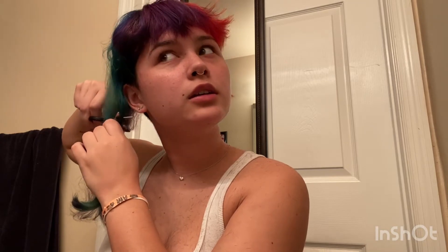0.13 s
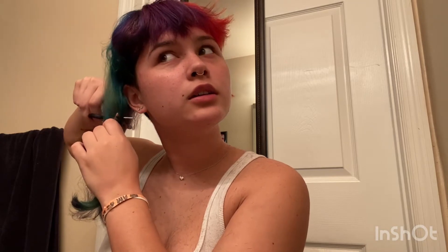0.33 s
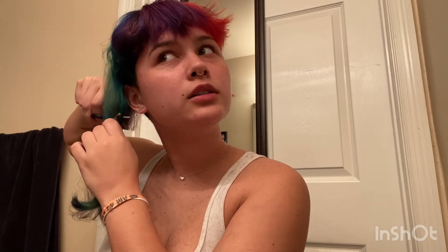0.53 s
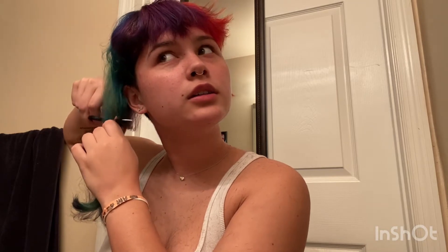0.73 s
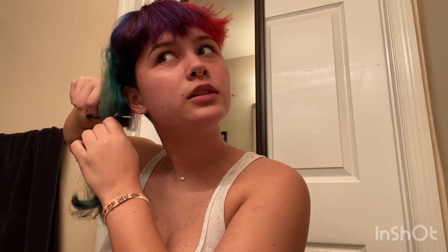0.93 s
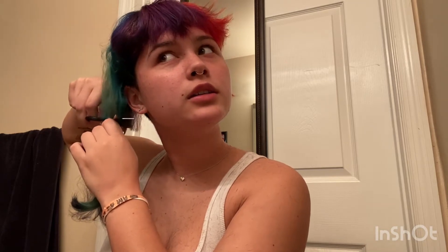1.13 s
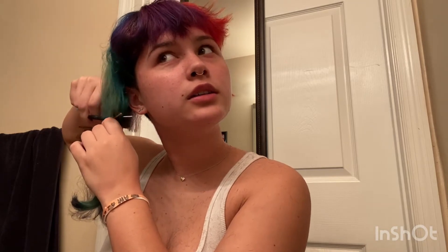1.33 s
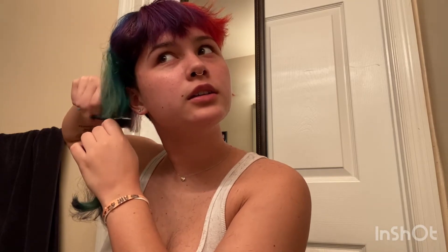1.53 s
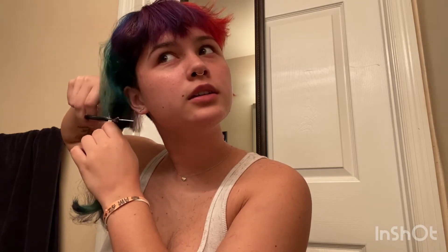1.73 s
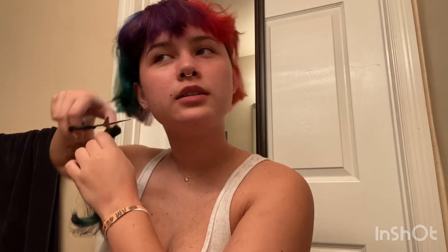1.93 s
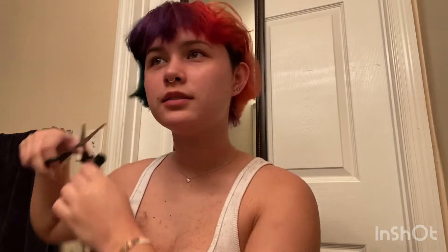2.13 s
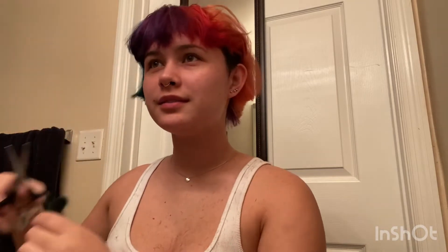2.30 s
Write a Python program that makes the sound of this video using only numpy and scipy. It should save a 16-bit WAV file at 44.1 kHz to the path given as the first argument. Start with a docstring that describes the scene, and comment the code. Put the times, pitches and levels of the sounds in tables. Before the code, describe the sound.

Close crisp snipping of hair, about three strokes a second, with faint blade slides between; then a pause with a faint swish and a bright metal snap, while a fan hums low in a small reverberant bathroom.

```python
"""Scissors chew through a thick lock of hair in a small hard bathroom, close to a two-port microphone.
From the start each stroke severs thousands of fibres, whose snaps set the steel blades ringing, and the
room answers; a fan motor hums in air noise while a low tone of the room swells and sinks. Between strokes
the blades slide open, a fainter burst of the same ringing, and now and then a touch and rattle clicks.
Late on the lock is drawn away with a swish of smooth noise, then come the last slides and clicks."""
import sys
import numpy as np
from scipy import signal
from scipy.fft import rfft, irfft, next_fast_len
from scipy.io import wavfile

SR = 44100
rng = np.random.default_rng(int(sys.argv[2]) if len(sys.argv) > 2 else 0)


def log_audio(samples):
    """Write samples as a 16-bit WAV file to the path given in sys.argv[1]."""
    # one column per channel
    frames = np.atleast_2d(samples).T
    # limit to full scale, then quantise
    limited = np.clip(frames, -1, 1)
    pcm = np.round(limited * 32767).astype(np.int16)
    wavfile.write(sys.argv[1], SR, pcm)


def voltage_ratio(decibels):
    """Convert decibels (scalar or array-like) to amplitude ratios, 20 dB per decade."""
    exponent = np.asarray(decibels, float) / 20
    return 10 ** exponent


N = 108574
T = np.arange(N) / SR
DEEP_TOP_HZ, LOW_TOP_HZ = 1460, 2850


def rms_one(x):
    """Normalisation: scales a signal to unit root-mean-square level."""
    return x / np.sqrt(np.mean(x ** 2) + 1e-20)


def log_interp(hz, points):
    """Logarithmic frequency scale: reads a table of (hz, value) between its points."""
    point_hz, value = np.transpose(points)
    return np.interp(np.log(hz), np.log(point_hz), value)


def colour(x, points):
    """Minimum-phase filtering: a folded cepstrum shapes the spectrum so that nothing sounds early."""
    size = 2 ** 13
    hz = np.maximum(np.arange(size // 2 + 1) * SR / size, 1)
    gain = voltage_ratio(np.maximum(log_interp(hz, points), -90))
    cepstrum = irfft(np.log(gain))
    # fold the backward half onto the forward half
    cepstrum[1:size // 2] *= 2
    cepstrum[size // 2 + 1:] = 0
    impulse = irfft(np.exp(rfft(cepstrum)))
    return signal.fftconvolve(x, impulse)[:len(x)]


def drift(corner_hz):
    """Low-passed random walk of chance: two equal poles smooth noise to a slow signal of spread 1."""
    step = 40  # samples between slow values
    r = np.exp(-2 * np.pi * corner_hz * step / SR)
    noise = rng.standard_normal(N // step + 2002)
    slow = signal.lfilter([1], [1, -2 * r, r * r], noise)[2000:]  # settled part
    return np.interp(np.arange(N) / step, np.arange(len(slow)), rms_one(slow))


def resonance(x, hz, width_hz):
    """Damped oscillator: a pole pair rings at hz and decays faster the wider its peak."""
    r = np.exp(-np.pi * width_hz / SR)
    zeros = [(1 - r * r) / 2, 0, (r * r - 1) / 2]
    poles = [1, -2 * r * np.cos(2 * np.pi * hz / SR), r * r]
    return signal.lfilter(zeros, poles, x)


def split(x, *edges_hz):
    """Complementary filtering: parts below, between and above the edges add up to the whole."""
    below = [signal.sosfiltfilt(signal.butter(5, hz, fs=SR, output="sos"), x) for hz in edges_hz]
    return np.diff([0 * x, *below, x], axis=0)


def ring(x, rings, plain_db, wander_db=0):
    """Modal superposition: plain sound plus steel modes, each taking its own share of the energy."""
    out = voltage_ratio(plain_db) * x
    for k, (hz, width_hz, peak_db) in enumerate(rings):
        mode = resonance(x, hz, width_hz)
        if wander_db:
            mode = mode * voltage_ratio(wander_db * drift(5.1))
        mode = mode * np.linalg.norm(x) / np.linalg.norm(mode)
        share = voltage_ratio(peak_db) * np.sqrt(np.pi * width_hz / SR)  # a wide mode holds more energy
        out = out + (-1) ** k * share * mode
    return out


def quarter_turn(x, points):
    """Pressure gradient: the difference of two close ports is a quarter cycle off their sum."""
    size = next_fast_len(N + SR)
    hz = np.maximum(np.arange(size // 2 + 1) * SR / size, 1)
    return irfft(1j * rfft(x, size) * voltage_ratio(log_interp(hz, points)), size)[:N]


# closing strokes through the hair; the last three columns are relative to level_db:
# start_s, rise_s, hold_s, level_db, low_db, middle_db, top_db
CUT_STROKES = [(0.0, 0.025, 0.056, -53.5, 0.5, -12.5, 1.5), (0.32, 0.028, 0.055, -56, 1, -11.5, 3),
               (0.633, 0.038, 0.025, -52.5, -2, -8.5, 0.5), (1.03, 0.0036, 0.011, -74, -13, -13, -2),
               (1.053, 0.048, 0.052, -53.5, -2.5, -15, -2), (1.357, 0.0039, 0.012, -76.5, -13, -17, 3),
               (1.367, 0.018, 0.05, -51.5, -4.5, -18, -9), (1.421, 0.018, 0.014, -47, -8.5, -3, 0.5),
               (1.483, 0.056, 0.022, -56.5, -4, 8, -10)]
# blades sliding open, in the same terms: start_s, rise_s, hold_s, level_db, low_db, middle_db
OPENING_SLIDES = [(0.191, 0.018, 0.016, -76, -5, -17), (0.494, 0.0099, 0.045, -75.5, -3.5, -18),
                  (1.206, 0.019, 0.041, -77, -15, -22), (2.223, 0.011, 0.0079, -76, -18, 7.5),
                  (2.248, 0.0045, 0.029, -63.5, -8, -5), (2.304, 0.0068, 0.032, -65.5, 7, 14)]
# ringing modes of the blades: pitch_hz, width_hz, peak_db (over a flat input)
BLADE_MODES = [(945, 186, 10), (2055, 90, 12), (2440, 460, 2.5), (4380, 130, 8.5), (5230, 430, 3.5),
               (6570, 320, 11), (6985, 204, 5), (7650, 430, 10), (9630, 580, 1)]
# spectrum given to the ringing blades: frequency_hz, gain_db
CUT_SPECTRUM = [(290, -85.5), (500, -13), (1010, -9), (1600, -8), (2060, -3), (3500, -9), (4200, -8.5),
                (10000, -3), (12500, -8), (14000, -14.5), (15800, -17.5)]


def cutting():
    """Impulsive excitation of modes: dense fibre snaps ring the blades; the deepest ring answers late."""
    fibres_per_s, fibre_spread_db = 9000, 2
    clump_db, clump_corner_hz = 0.1, 700
    release_s, deep_lag_s = 0.021, 0.0076
    slide_top_db = 1
    air_follows = 0.36  # a harder bite lifts the highest hiss along with the middle

    struck = rng.random(N) < fibres_per_s / SR
    strength = voltage_ratio(fibre_spread_db * rng.exponential(1, N))
    snaps = struck * strength * rng.choice([-1, 1], N)
    snaps = snaps * voltage_ratio(clump_db * drift(clump_corner_hz))
    # each mode swells and fades as the bite point moves
    rung = ring(snaps, BLADE_MODES, plain_db=1.5, wander_db=2.5)
    rung = rms_one(colour(rung, CUT_SPECTRUM))
    deep, low, middle, high, top, air = split(rung, DEEP_TOP_HZ, LOW_TOP_HZ, 4050, 7900, 10600)

    out = np.zeros(N)
    slides = [(*row, slide_top_db) for row in OPENING_SLIDES]
    for start, rise, hold, db, low_db, middle_db, top_db in CUT_STROKES + slides:
        fall = voltage_ratio(db) * np.exp(-np.maximum(T - start - rise - hold, 0) / release_s)
        early = np.clip((T - start) / rise, 0, 1) ** 0.66 * fall
        late = np.clip((T - start - deep_lag_s) / rise, 0, 1) ** 0.66 * fall
        bright = voltage_ratio(top_db) * (top + voltage_ratio(air_follows * middle_db) * air)
        out += early * (voltage_ratio(low_db) * low + voltage_ratio(middle_db) * middle + high + bright)
        out += late * voltage_ratio(low_db) * deep
    return out


# time for the tiled room's tail to die by 60 dB: frequency_hz, decay_s
ROOM_DECAY = [(500, 0.19), (2000, 0.27), (14000, 0.32)]


def room(x):
    """Diffuse reverberation: two unrelated noise tails, each octave dying at its own rate."""
    gap_s, build_s = 0.0033, 0.0041
    t = np.arange(SR // 2) / SR
    edges = 300 * 2 ** np.arange(0, 6.1, 1)
    out = []
    for side in range(2):
        tail = np.zeros(len(t))
        for bottom, top in zip(edges, edges[1:]):
            octave = signal.butter(2, [bottom, top], "band", fs=SR, output="sos")
            noise = signal.sosfilt(octave, rng.standard_normal(len(t)))
            tail += noise * voltage_ratio(-60 * t / log_interp(np.sqrt(bottom * top), ROOM_DECAY))
        tail *= np.clip((t - gap_s) / build_s, 0, 1)
        tail /= np.sqrt(np.sum(tail ** 2))
        out.append(signal.fftconvolve(x, tail)[:N])
    return out


# the low tone of the room as it swells and sinks: time_s, pitch_hz, level_db (rms)
LOW_TONE_PATH = [(0.0, 65.6, -63), (0.2, 58.5, -61), (0.34, 64.3, -53), (0.46, 68.9, -62), (0.6, 61.5, -76),
                 (0.698, 70.1, -51), (1.069, 66.64, -53), (1.12, 65.8, -44), (1.219, 68.9, -58),
                 (1.531, 70.3, -65), (1.6, 65.8, -60), (1.679, 59, -67), (1.759, 60.1, -66),
                 (1.879, 63.46, -54.5), (1.99, 64.9, -41.5), (2.179, 67.12, -38), (2.251, 64.66, -52.5),
                 (2.4, 66.2, -57), (2.46, 67.4, -45.5)]


def tones():
    """Phase accumulation: motor hum and low room tone are sines, both wavering a little."""
    time_s, pitch_hz, level_db = np.transpose(LOW_TONE_PATH)
    hum_level = voltage_ratio(-48 + 0.46 * drift(3.4))
    hum_hz = 119.7 + 0.37 * drift(1.94)
    hum = hum_level * np.sin(2 * np.pi * np.cumsum(hum_hz) / SR)
    low_level = voltage_ratio(np.interp(T, time_s, level_db) + 0.6 * drift(8.7))
    low_hz = np.interp(T, time_s, pitch_hz)
    low = low_level * np.sin(2 * np.pi * np.cumsum(low_hz) / SR)
    return np.sqrt(2) * (hum + low)  # peak from rms


# duct resonances, each passed twice: pitch_hz, width_hz (of one pass), mid_db, side_db (rms)
DUCT_RINGS = [(141.3, 11.8, -63.5, -83.5), (247.1, 25.7, -70.5, -94.5), (341.7, 30, -72, -76.5),
              (812, 67, -85.5, -82.5)]


def fan(spectrum, db, column):
    """Broadband flow noise: lumpy below and smooth above, with a few duct resonances."""
    patchy_db = 3
    noise = colour(rng.standard_normal(N + SR), spectrum)[SR:]  # settled part
    low, hiss = split(voltage_ratio(db) * rms_one(noise), DEEP_TOP_HZ)
    out = voltage_ratio(patchy_db * drift(11.7)) * low + hiss
    white = rng.standard_normal(N + SR)
    for row in DUCT_RINGS:
        hz, width_hz = row[:2]
        duct = resonance(resonance(white, hz, width_hz), hz, width_hz)[SR:]
        out = out + voltage_ratio(row[column]) * rms_one(duct)
    return out


# metal clicks of blades and handles; low and middle are relative to level_db:
# start_s, level_db, low_db, middle_db, contact_s, echo_db (sent to the room, relative to the click)
METAL_CLICKS = [(0.832, -36, 12, 5, 0.0022, -2.5), (1.4464, -26.5, -22, 16, 0.001, -3.5),
                (2.2547, -40, -0.5, -27, 0.00069, 7.5), (2.3159, -19, -0.5, -23, 0.00039, -4),
                (2.407, -42, 10.5, 10, 0.0013, 3)]
# modes of the clicking metal: pitch_hz, width_hz, peak_db (over a flat input)
CLICK_MODES = [(2080, 220, 10), (4300, 450, 10), (5850, 600, 8.5), (7400, 1300, 7), (10000, 3000, 0)]
# spectrum given to the clicks: frequency_hz, gain_db
CLICK_SPECTRUM = [(500, -35), (900, -17), (1800, -5), (3200, -6), (6500, -0.5), (9500, -3), (13000, -4.5),
                  (15800, -26)]


def click_parts(blow):
    """Modal response: the low, middle and high parts of the metal's answer to a blow."""
    rung = ring(blow, CLICK_MODES, plain_db=-13)
    return split(colour(rung, CLICK_SPECTRUM), LOW_TOP_HZ, 4700)


def clicks():
    """Contact mechanics: a touch and a rattle, stronger in long contacts; gives near sound and room feed."""
    chatter_s = 0.00048  # a contact this long rattles as strongly as it first touches
    out = np.zeros((2, N + SR))
    t = np.arange(-200, 2000) / SR
    touch = 1. * (t == 0)
    clean = click_parts(touch)
    energy = np.linalg.norm(clean, axis=1) / np.linalg.norm(clean[2])
    for start, db, low_db, middle_db, contact, echo_db in METAL_CLICKS:
        push = np.maximum(t, 0) / contact
        rattle = rng.standard_normal(len(t)) * push * np.exp(-push)
        blow = touch + contact / chatter_s * rattle / np.linalg.norm(rattle)
        parts = click_parts(blow)
        # each part gets its set level whatever the rattle drew
        levels = voltage_ratio(db + np.array([low_db, middle_db, 0])) * energy
        click = (levels / np.linalg.norm(parts, axis=1)) @ parts
        first = int((start + t[0]) * SR)
        out[:, first:first + len(t)] += voltage_ratio([[0], [echo_db]]) * click
    return out[:, :N]


# the lock being drawn away: time_s, level_db
SWISH_PATH = [(1.86, -90), (1.894, -84), (2.034, -67), (2.143, -70), (2.222, -81.5), (2.24, -88)]
# spectrum of the swish: frequency_hz, gain_db
SWISH_SPECTRUM = [(710, -52), (1200, -15), (1970, -13), (2910, -7.5), (5260, -11), (8640, -2), (12300, -10),
                  (15800, -41)]


def swish():
    """Friction noise: hair sliding past hair is smooth bright noise, unrelated in mid and side."""
    time_s, level_db = np.transpose(SWISH_PATH)
    level = voltage_ratio(np.interp(T, time_s, level_db, left=-200, right=-200))
    return [level * rms_one(colour(rng.standard_normal(N), SWISH_SPECTRUM)) for side in range(2)]


# fan air spectra in mid and side: frequency_hz, gain_db
FAN_MID_SPECTRUM = [(12, -31), (20, -11), (48, -6), (130, -7), (170, -14.5), (355, -24), (419, -31),
                    (637, -39), (942, -42), (1050, -44), (1740, -51), (8310, -56), (15800, -67.5)]
FAN_SIDE_SPECTRUM = [(12, -27.5), (20, -26.5), (65, -7.5), (133, -2), (350, -26.5), (510, -26),
                     (1000, -40.5), (3000, -47), (7000, -48.5), (8000, -67), (11500, -53.5), (15800, -62)]
# the side's colour against the mid: frequency_hz, gain_db
SIDE_SPECTRUM = [(300, 0), (700, -1.5), (3300, -1), (5500, 1.5), (7000, -6), (7800, -15), (10000, -13),
                 (11000, -4.5), (13000, 5), (15500, 23.5)]


def scene():
    """Mid-side superposition: scissors, echo, swish and tones over the fan, turned to left and right."""
    cut, tone = cutting(), tones()
    click, click_echo = clicks()
    swish_mid, swish_side = swish()
    wet_mid, wet_side = room(voltage_ratio(-3.5) * cut + click_echo)
    near = cut + click

    mid = near + wet_mid + swish_mid + tone + fan(FAN_MID_SPECTRUM, -57, column=2)

    side = quarter_turn(voltage_ratio(-0.5) * near + wet_side + swish_side, SIDE_SPECTRUM)
    side = side + voltage_ratio(-24) * tone  # in-phase lean to one side
    side = side + quarter_turn(tone, [(50, -23), (200, -23)])
    side = side + fan(FAN_SIDE_SPECTRUM, -61, column=3)
    return np.array([mid + side, mid - side])


def top_cut(x):
    """Nothing passes above the cut-off."""
    return signal.sosfilt(signal.butter(12, 15950, fs=SR, output="sos"), x)


def record(dry):
    """Direct path: the finished mix goes on with no further gain or filter."""
    return top_cut(dry)


dry = scene()
out = record(dry)
log_audio(out)
```